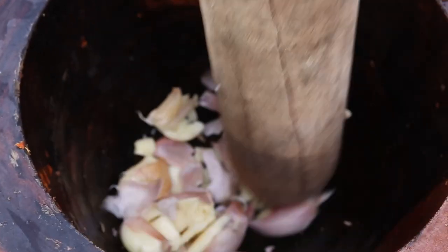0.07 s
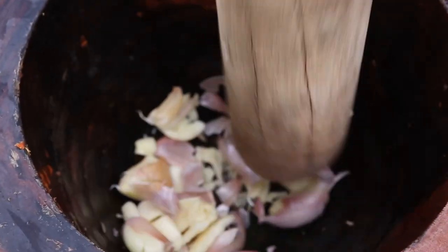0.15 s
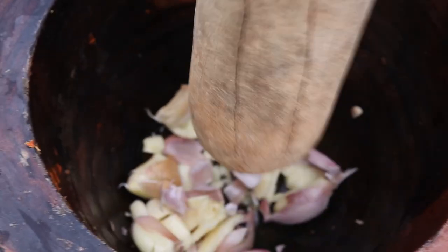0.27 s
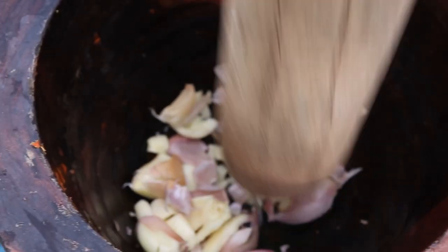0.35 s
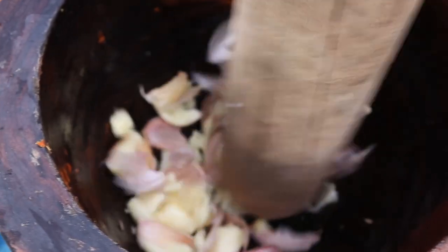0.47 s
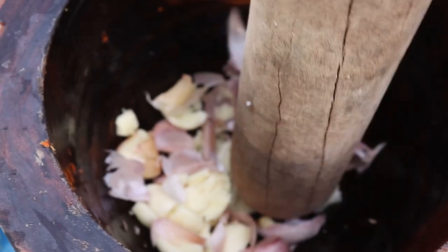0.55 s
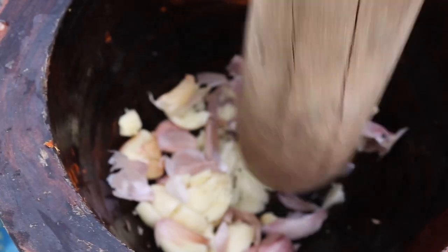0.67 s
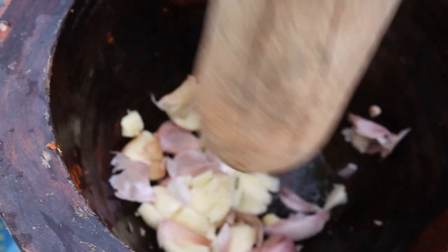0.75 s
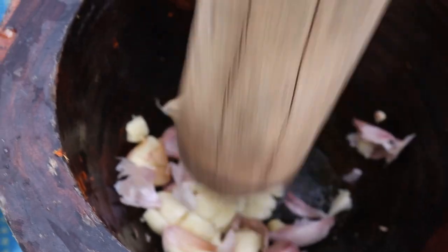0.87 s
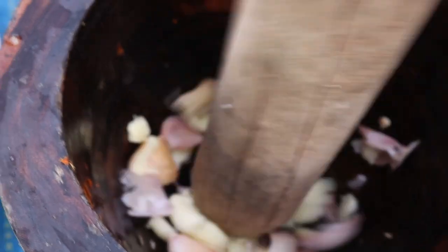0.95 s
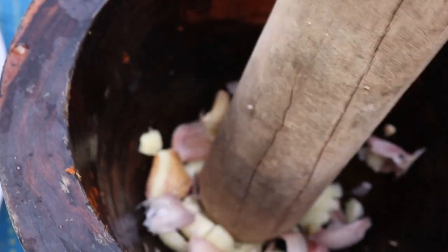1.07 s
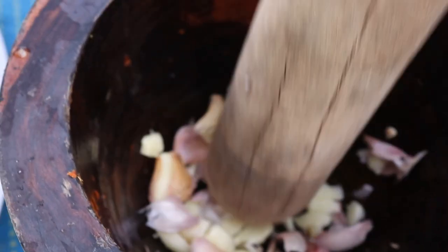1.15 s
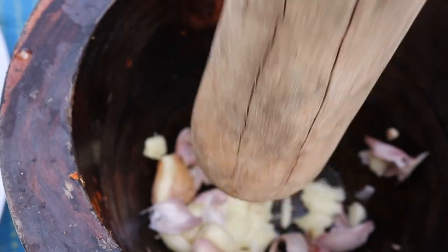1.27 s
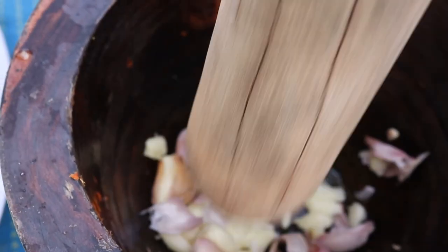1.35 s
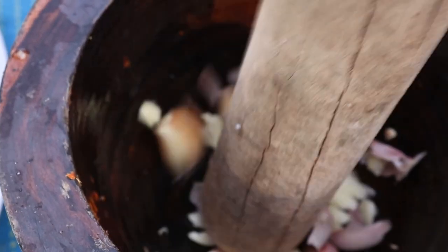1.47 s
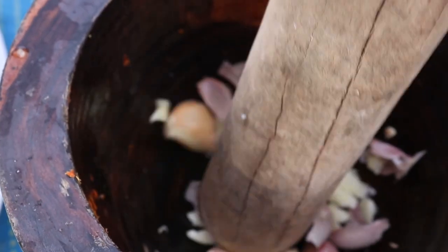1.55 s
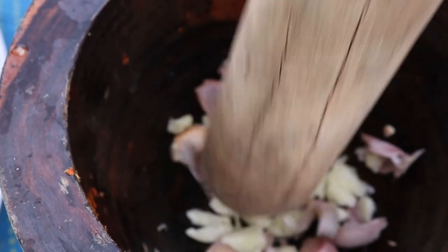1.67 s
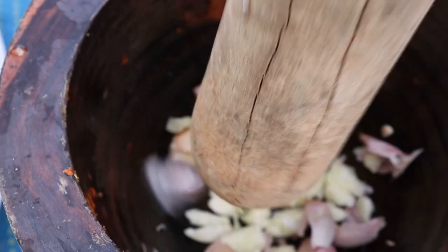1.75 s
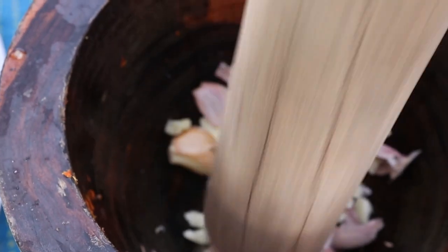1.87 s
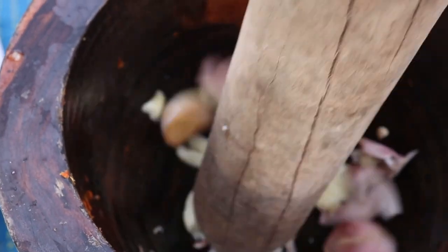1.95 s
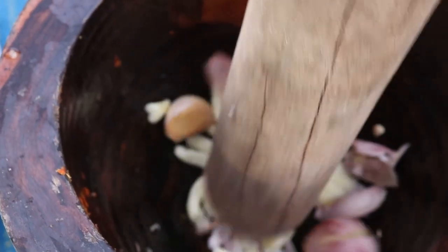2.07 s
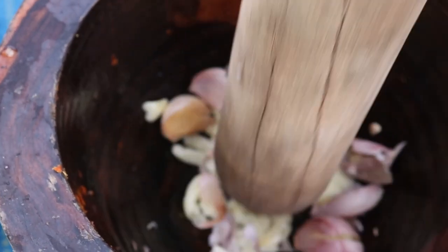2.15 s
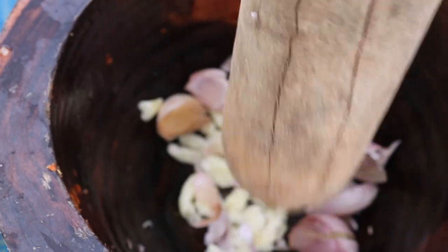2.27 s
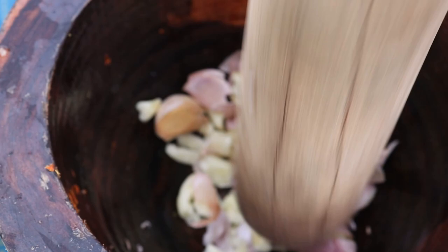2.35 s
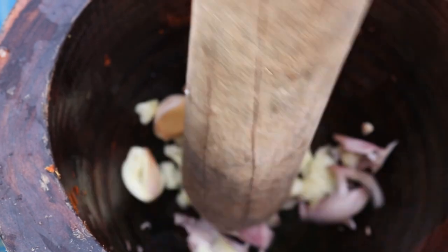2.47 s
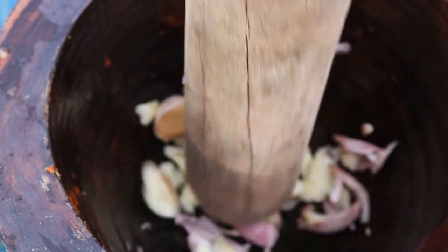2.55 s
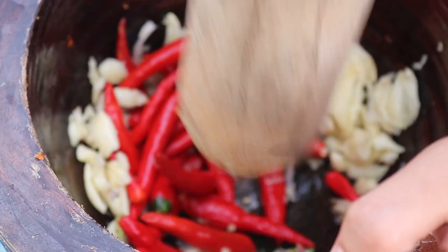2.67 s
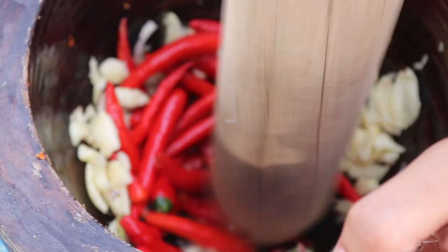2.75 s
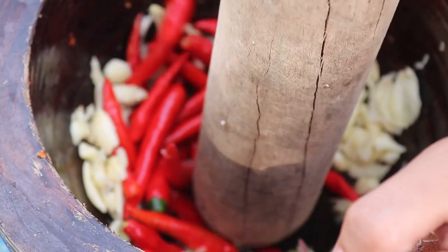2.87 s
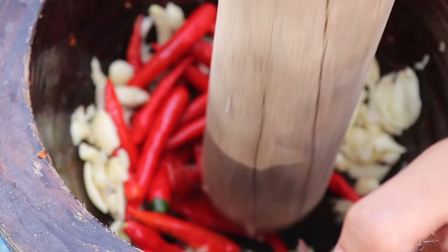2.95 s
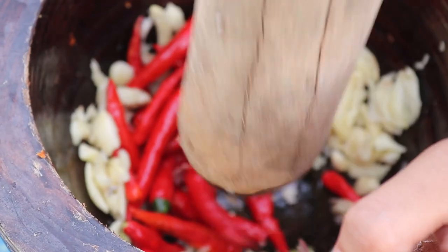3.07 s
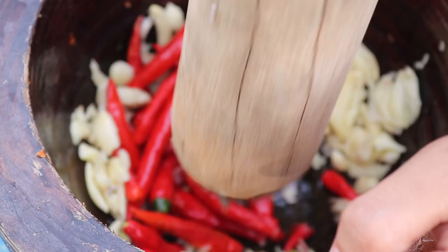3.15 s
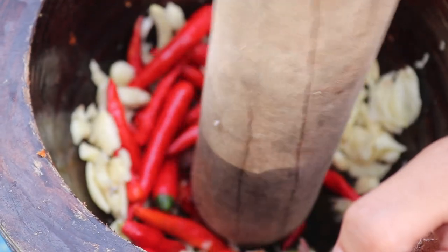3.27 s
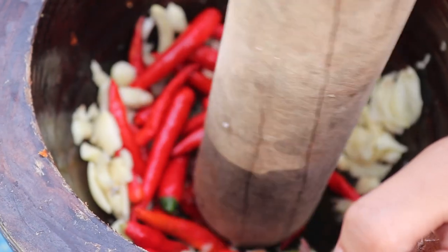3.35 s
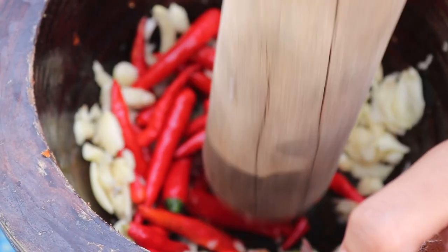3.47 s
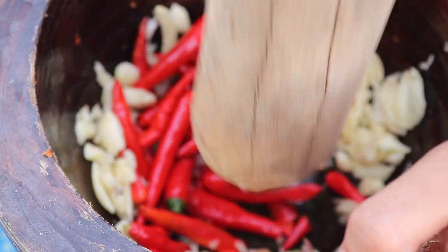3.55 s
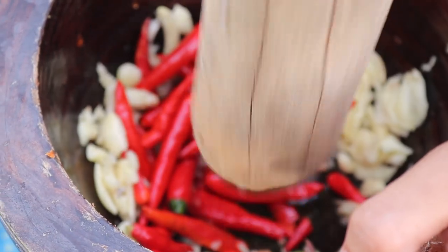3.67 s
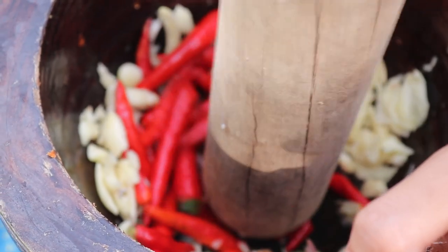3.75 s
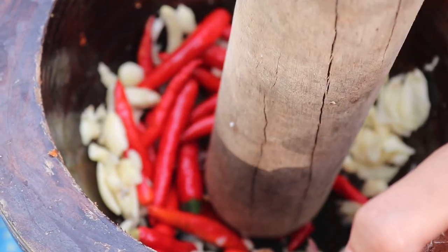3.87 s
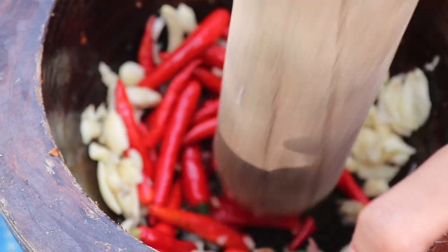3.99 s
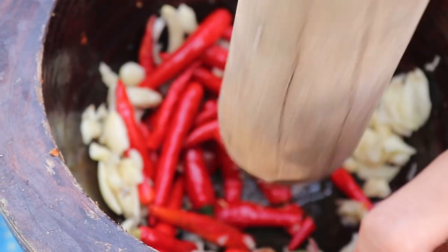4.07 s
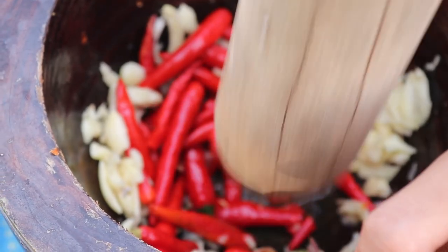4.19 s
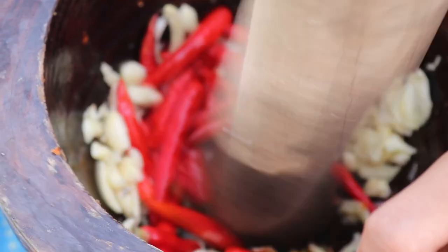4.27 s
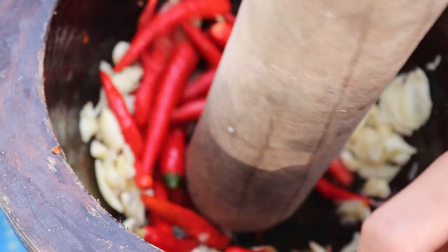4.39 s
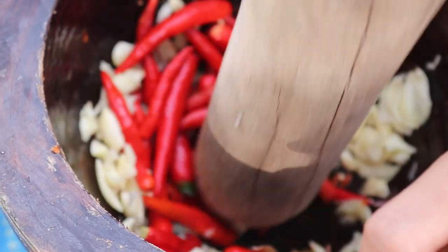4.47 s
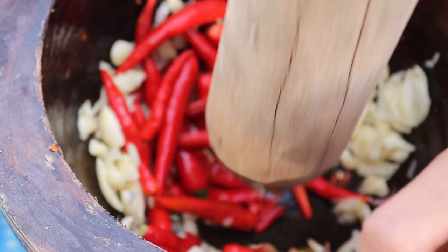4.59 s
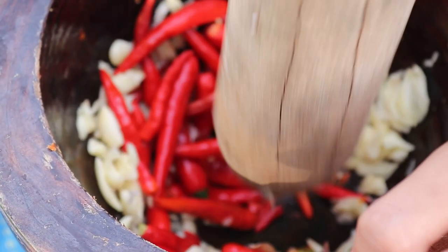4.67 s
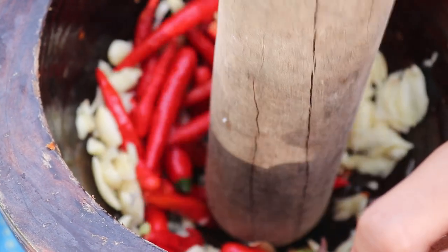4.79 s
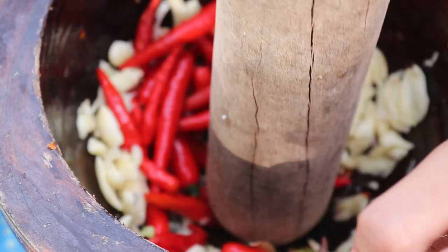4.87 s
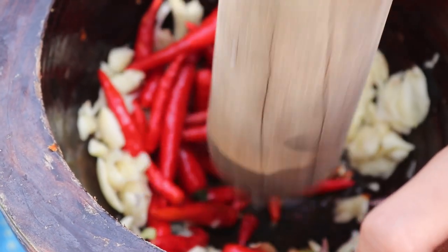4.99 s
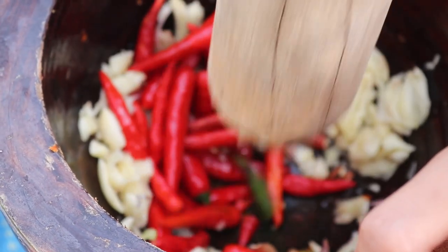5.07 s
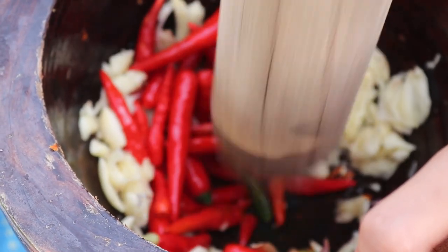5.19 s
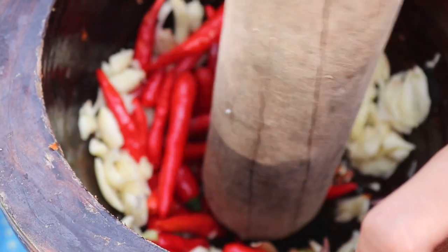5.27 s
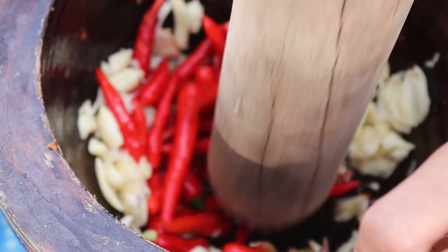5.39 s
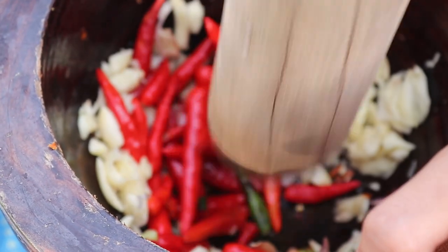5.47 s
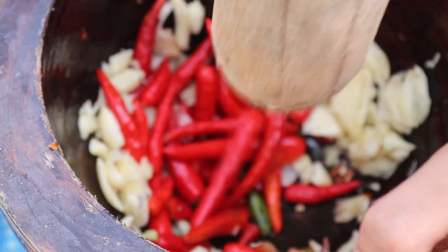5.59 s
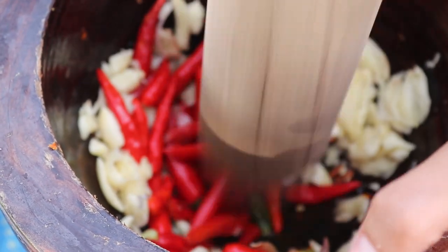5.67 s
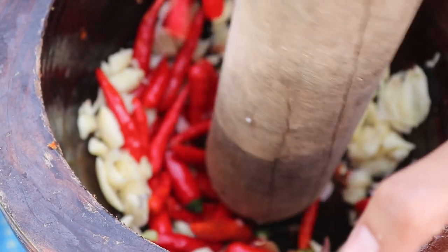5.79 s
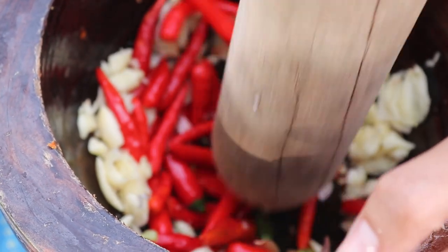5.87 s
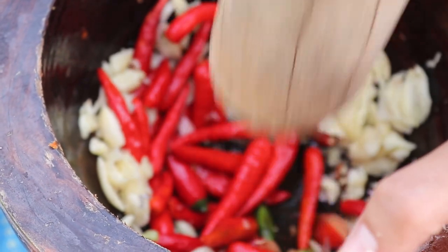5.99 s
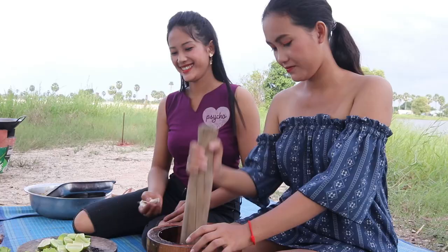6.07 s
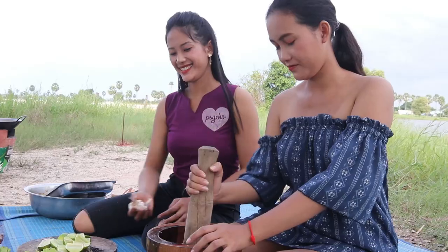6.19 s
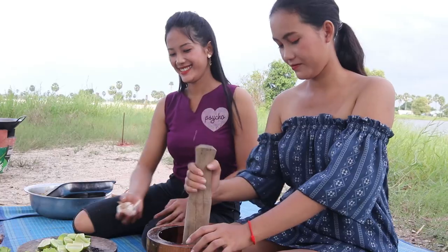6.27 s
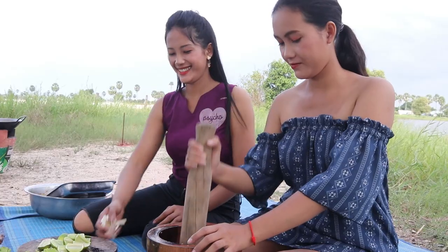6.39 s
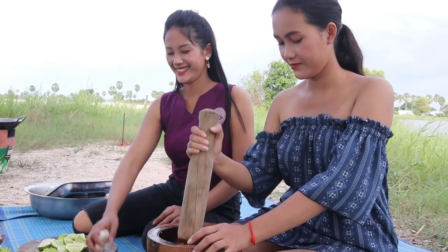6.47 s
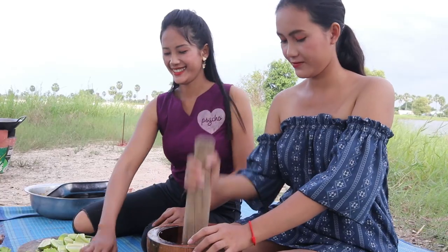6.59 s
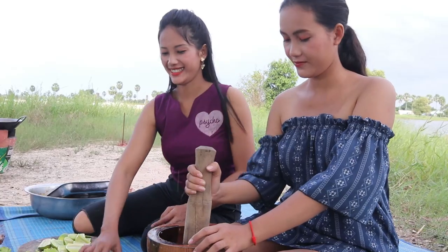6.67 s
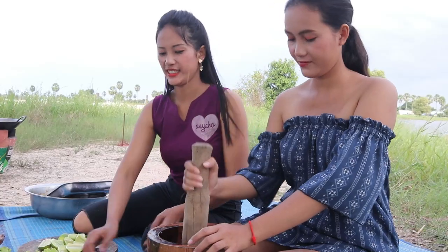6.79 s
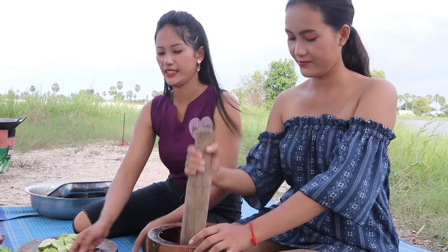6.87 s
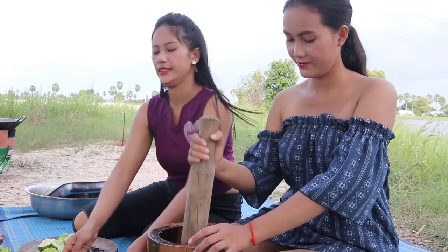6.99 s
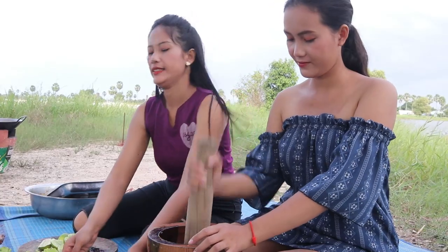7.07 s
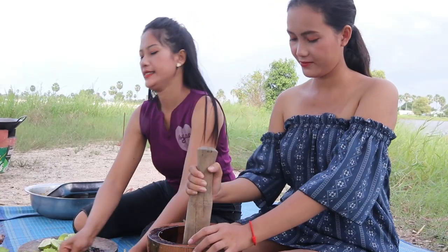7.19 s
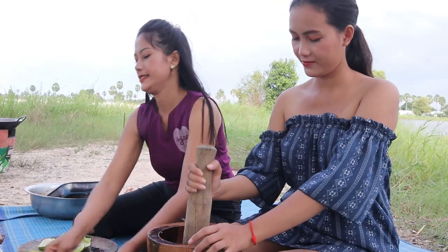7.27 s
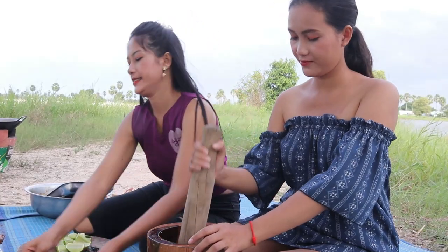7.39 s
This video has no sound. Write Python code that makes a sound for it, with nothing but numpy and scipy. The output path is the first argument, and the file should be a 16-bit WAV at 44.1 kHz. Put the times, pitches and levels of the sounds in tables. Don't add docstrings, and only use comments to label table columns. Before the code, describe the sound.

Outdoors in a breeze, a wooden pestle strikes garlic in a thick wooden mortar roughly twice a second, very close to the microphone. Cloves burst with sharp cracks and dry skins tick and rustle; a metal bowl scrapes briefly. Then chillies replace the garlic, giving moist crunches, hollow pod taps and loud woody knocks. After a tiny gap the pounding is softer, heard from the side, under stronger gusty wind.

```python
import sys
import numpy as np
from scipy import signal
from scipy.fft import rfft, irfft, next_fast_len
from scipy.io import wavfile
from scipy.ndimage import uniform_filter1d, minimum_filter1d

SR = 44100
rng = np.random.default_rng(int(sys.argv[2]) if len(sys.argv) > 2 else 0)


def invert_db(x):
    u = np.asarray(x, float) / 20
    return 10 ** u


def master(y):
    cut = np.clip(np.atleast_2d(y).T, -1, 1)
    pcm = np.round(cut * 32767)
    wavfile.write(sys.argv[1], SR, pcm.astype(np.int16))


N = 327677
CHILLI_FROM = 2.65
SILENT_FROM, SILENT_TO = 6.102, 6.113

# (frequency [Hz], density [dB per Hz])
GARLIC_SPECTRUM = [(180, -37), (300, -16), (1040, -9.5), (1610, -2), (2400, -4.5), (4150, -2.5), (5880, -4),
                   (6610, -15.5), (7540, -5), (10900, -9.5), (15900, -23)]
# (frequency [Hz], density [dB per Hz])
LEAF_SPECTRUM = [(530, -30), (900, -10), (1030, -6), (1550, -4), (2210, -3.5), (2390, -4.5), (2750, -1),
                 (3170, -4.5), (4420, -7), (5980, -11), (7390, -23), (10000, -35), (13000, -69),
                 (22000, -120)]
# (time [s], level [dB])
STIRRING = [(0, -48.5), (.23, -43), (.95, -45.5), (1.1, -42), (1.26, -46.5), (1.5, -41.5), (1.73, -41),
            (1.88, -47.5), (2.05, -39.5), (2.21, -41), (2.33, -48.5), (2.6, -47), (2.72, -35.5),
            (2.9, -37.5), (3.1, -37), (4.3, -40), (5.1, -36.5), (6.05, -38), (7.43, -39)]


def evened(x):
    return x / np.sqrt(np.mean(x ** 2) + 1e-20)


def add(mix, s, sound):
    part = mix[max(round(s * SR), 0):][:len(sound)]
    part += sound[:len(part)]


def coloured(x, points):
    hz, db = np.transpose(points)
    size = next_fast_len(len(x))
    f = np.fft.rfftfreq(size, 1 / SR)
    gain_db = np.interp(np.log(f + 1), np.log(hz + 1), db, right=-90)
    return irfft(rfft(x, size) * invert_db(gain_db), size)[:len(x)]


def resonate(x, hz, width):
    r = np.exp(-np.pi * width / SR)
    return signal.lfilter([1 - r, 0, r - 1], [1, -2 * r * np.cos(2 * np.pi * hz / SR), r * r], x)


def curve(rows, column):
    rows = np.array(rows)
    return np.interp(np.arange(N) / SR, rows[:, 0], rows[:, column])


def lumpy(size, length, depth_db):
    width = max(int(length * SR), 1)
    slow = uniform_filter1d(uniform_filter1d(rng.standard_normal(size), width), width)
    return invert_db(depth_db * evened(slow))


def mode(hz, db, t60):
    t = np.arange(SR // 8) / SR
    return invert_db(db - 60 * t / t60) * np.sin(2 * np.pi * hz * t)


def random_hits(per_s, spread_db):
    hit = rng.random(N) < per_s / SR
    strength = invert_db(spread_db * np.minimum(rng.exponential(1, N), 4))
    return hit * strength * rng.choice([-1, 1], N)


def buffeting_db():
    # (time [s], level [dB])
    breeze = [(0, -47), (.2, -38.5), (1.2, -31), (1.7, -30), (2.3, -40), (3.1, -36), (4.4, -42.5),
              (5.6, -38), (6.05, -37.5), (6.25, -26), (7.43, -27.5)]
    # (peak time [s], peak level [dB], length [s])
    gusts = [(0.182, -26.5, 0.095), (0.311, -17.5, 0.13), (0.444, -24, .2), (0.783, -25, 0.21),
             (0.984, -17.5, .09), (1.82, -25, 0.11), (2.123, -26.5, 0.19), (2.61, -26.5, 0.17),
             (2.842, -26.5, .14), (3.357, -29, .07), (3.863, -22.5, 0.05), (5.734, -28, 0.23),
             (6.291, -20.5, 0.13), (6.606, -19, 0.34), (6.97, -22.5, 0.094), (7.43, -22.5, 0.15)]
    t = np.arange(N) / SR
    pressure = invert_db(curve(breeze, 1))
    for s, db, length in gusts:
        pressure += invert_db(db) * np.exp(-8 * ((t - s) / length) ** 2)
    return 20 * np.log10(pressure)


def wind():
    # (frequency [Hz], density [dB per Hz])
    buffet_spectrum = [(5.9, -7.5), (10, 1), (28, -1), (91, -11), (113, -18.5), (188, -20.5), (250, -30.5),
                       (320, -60), (550, -120)]
    # (frequency [Hz], density [dB per Hz])
    roar_spectrum = [(47, -23), (80, -6.5), (285, -16.5), (404, -18), (480, -22), (845, -25.5),
                     (1200, -47.5), (1560, -40), (2640, -120)]
    calm_db = -34
    buffet = coloured(rng.standard_normal(N), buffet_spectrum)
    buffet /= uniform_filter1d(buffet ** 2, round(.09 * SR)) ** 0.13
    roar = evened(coloured(rng.standard_normal(N), roar_spectrum) * lumpy(N, 0.014, 1.7))
    level_db = buffeting_db()
    roar_db = -40 + 0.24 * (level_db - calm_db)
    return invert_db(level_db) * evened(buffet) + invert_db(roar_db) * roar


def rustle():
    # (frequency [Hz], length [cycles], level [dB])
    stalks = [(1480, 4.7, -4.5), (2000, 5.9, -2), (2270, 12.6, -1), (2800, 7, -2), (3480, 8.4, -4.5),
              (4500, 10, -4), (5270, 9.6, -4.5)]
    # (frequency [Hz], density [dB per Hz])
    air_spectrum = [(4500, -17.5), (5800, -9.5), (6600, -14.5), (9000, -15.5), (13500, -23.5), (15700, -26),
                    (16200, -50)]
    grains = np.zeros(N)
    for hz, cycles, db in stalks:
        t = np.arange(round(cycles * SR / hz))
        grain = np.hanning(len(t)) * np.sin(2 * np.pi * hz * t / SR)
        grains += invert_db(db) * signal.oaconvolve(random_hits(70, 3.65), grain / np.linalg.norm(grain))[:N]
    hiss = coloured(rng.standard_normal(N) * lumpy(N, 0.0019, 2.33), LEAF_SPECTRUM)
    stir_db = curve(STIRRING, 1)
    near = invert_db(stir_db) * (0.5 * evened(grains) + 0.73 * evened(hiss)) * lumpy(N, 0.012, 1.8)
    rest_db = STIRRING[0][1]
    skin_db = -10 + 1.44 * (stir_db - rest_db) + rest_db
    air_db = np.where(np.arange(N) < CHILLI_FROM * SR, skin_db, -16 + stir_db)
    air = evened(coloured(rng.standard_normal(N) * lumpy(N, .003, 2.1), air_spectrum))
    return near + invert_db(air_db) * air


def rolling_pods():
    hits = random_hits(150, 4.5)
    pod = rng.integers(-1, 3, N)
    ring = np.zeros(N)
    for k in range(-1, 3):
        hz = 2230 * (1 + .12 * k)
        ring += invert_db(-4.0 * abs(k)) * resonate(resonate(hits * (pod == k), hz, 160), hz, 900)
    t = np.arange(N) / SR
    fade_db = 3.5 * (t - CHILLI_FROM)
    present = (t > CHILLI_FROM) & (t < SILENT_FROM)
    return invert_db(curve(STIRRING, 1) - 6 - fade_db) * evened(ring) * present


def rubs():
    # (start [s], length [s], frequency [Hz], width [Hz], rms level [dB])
    short_rubs = [(0.966, 0.064, 173, 13, -16), (.45, 0.067, 181.4, 14, -29), (2.49, .05, 4200, 3500, -27),
                  (2.12, .1, 9000, 5000, -48), (1.56, .2, 9000, 5000, -51), (.15, .14, 9000, 5000, -51),
                  (0.802, 0.031, 2050, 630, -43), (1.412, .04, 590, 680, -33),
                  (1.426, 0.085, 780, 240, -39.5), (1.576, 0.18, 710, 300, -40),
                  (1.625, 0.14, 745, 22, -42), (1.6, .07, 1000, 60, -47), (1.657, 0.11, 4270, 75, -47),
                  (2.093, .12, 4230, 90, -45), (2.045, 0.13, 2900, 60, -45), (2.1, .09, 2400, 70, -45),
                  (2.535, .03, 3500, 4000, -40), (3.856, 0.005, 2710, 460, -6),
                  (4.371, .011, 1650, 120, -3), (7.33, .12, 9000, 5000, -47),
                  (2.657, 0.076, 2000, 2450, -32), (6.786, 0.043, 1125, 81, -35),
                  (6.825, .012, 1460, 200, -36)]
    out = np.zeros(N)
    for s, length, hz, width, db in short_rubs:
        noise = rng.standard_normal(SR // 2) * lumpy(SR // 2, .002, 3.0)
        tone = resonate(resonate(noise, hz, width), hz, width)[-round(length * SR):]
        add(out, s, invert_db(db) * evened(tone) * signal.windows.tukey(len(tone), .7))
    return out


def metal_scrape():
    # (start [s], length [s], rms level [dB])
    drags = [
        (1.825, 0.099, -28.5),
        (1.91, .075, -40),
    ]
    # (frequency [Hz], width [Hz], level [dB])
    metal_modes = [(651, 44, -9), (1440, 31, -6), (2450, 36, -7), (2790, 24, 0), (3160, 56, -12),
                   (4020, 40, -1), (4250, 31, -7), (5880, 36, -1), (7430, 33, -15), (9240, 36, -19),
                   (11100, 33, -26), (13200, 43, -29)]
    out = np.zeros(N)
    for s, length, db in drags:
        slips = rng.standard_normal(SR // 2) * lumpy(SR // 2, 0.005, 2.2)
        lines = np.zeros(SR // 2)
        for hz, width, line_db in metal_modes:
            line = resonate(resonate(slips, hz, .9 * width), hz, 22 * width)
            lines += invert_db(line_db) * np.sqrt(width) * evened(line)
        lines = evened(lines) + 0.3 * evened(coloured(slips, GARLIC_SPECTRUM))
        lines = lines[-round(length * SR):]
        add(out, s, invert_db(db) * evened(lines) * signal.windows.tukey(len(lines), .85))
    return out


def settling_bits():
    # (start [s], length [s], least peak level [dB], frequency [Hz], papery top [dB below the peak])
    flurries = [
        (.07, .23, -33, 3300, -11),
        (.4, .08, -30, 3000, -25),
        (1.08, .3, -37, 2900, -19),
        (1.56, .26, -35, 2900, -12),
        (2.04, .32, -34, 3100, -9),
        (2.64, .14, -33, 2400, -19),
        (3.38, .25, -31, 2300, -31),
        (6.75, .06, -33, 2400, -19),
    ]
    slot, chance, detune = 1000, .095, .3
    rows = []
    for start, length, db, hz, top_db in flurries:
        when, size, tune = rng.random((round(length * SR / slot), 3)).T
        for k in np.flatnonzero(when < chance):
            peak_db = db - 3.2 * np.log(size[k] + .02)
            rows.append((start + k * slot / SR, peak_db, hz * (1 + detune * (2 * tune[k] - 1)), top_db))
    return rows


def snaps():
    # (time [s], peak level [dB], frequency [Hz], papery top [dB below the peak])
    clear_snaps = [(.176, -27, 4830, -9), (.1972, -22, 4370, 0.5), (.2073, -15.5, 3700, -5),
                   (.2115, -16, 4750, -26), (.25, -26, 6000, -5), (.2772, -25.5, 3150, -2),
                   (.409, -22, 2770, -31), (.851, -26.5, 4260, -31), (1.1865, -27, 2540, -22),
                   (1.0537, -27, 2100, -15), (1.1094, -24.5, 2730, -22), (1.145, -28, 2830, -30),
                   (1.2087, -23.5, 3670, -7), (1.2275, -26, 3080, -12), (1.2516, -28, 2800, -1),
                   (1.273, -27, 5180, -6), (1.629, -23, 2450, -24), (1.711, -20, 4970, -26),
                   (2.1985, -24, 2870, -17), (2.444, -29, 1500, -25), (2.6318, -29, 2920, -5),
                   (2.6444, -29, 3490, -1), (2.079, -32, 2780, -3), (3.1154, -22, 2220, -33),
                   (3.243, -19.5, 2190, -35), (3.444, -22, 2200, -32), (3.5515, -19, 2170, -33),
                   (4.5842, -21.5, 1920, -31), (5.7397, -22, 2280, -30), (6.786, -26, 2370, -21)]
    out, t = np.zeros(N), np.arange(400) / SR
    for s, db, hz, top_db in list(clear_snaps) + settling_bits():
        puff = rng.standard_normal(len(t)) * np.exp(-t / 0.0011) * (1 - np.exp(-t / 0.00012))
        pitch = evened(resonate(resonate(puff, hz, 0.4 * hz), hz, 0.4 * hz))
        snap = pitch + 0.42 * evened(coloured(puff, LEAF_SPECTRUM))
        top = resonate(resonate(puff, 9200, 4500), 9200, 4500)
        add(out, s, invert_db(db + 0.5) * (snap / abs(snap).max() + invert_db(top_db) * top / abs(top).max()))
    return out


def taps():
    # (time [s], peak level [dB], frequency [Hz])
    garlic_bits = [(0.7736, -32, 2900), (0.8644, -35, 2940), (0.8974, -29, 2270), (1.2952, -27, 2490),
                   (1.3486, -31, 2250), (1.365, -26, 2930), (1.4129, -26, 2240), (1.4279, -26, 2470),
                   (1.4644, -32, 2630), (1.5832, -24, 4720), (1.657, -26, 2350), (1.7423, -30, 2710),
                   (1.7712, -27, 2470), (1.7932, -34, 2220), (1.8087, -29, 2590), (1.8824, -20, 2800),
                   (1.9583, -25, 3980), (2.1259, -27, 4220), (2.1694, -24, 3330), (2.2217, -26, 2800),
                   (2.2681, -30, 4440), (2.3055, -33, 3220), (2.3509, -33, 2250)]
    # (time [s], peak level [dB], frequency [Hz])
    pod_taps = [(2.6631, -24, 1800), (2.6856, -20, 1770), (2.7025, -20, 2660), (2.7174, -19, 2220),
                (2.7501, -19, 2160), (2.7756, -22, 2900), (2.8058, -24, 2940), (2.9989, -24, 1920),
                (3.0228, -27, 2800), (3.0634, -23, 1880), (3.4015, -21, 3210), (3.4206, -21, 2250),
                (3.4932, -24, 2220), (3.6015, -20, 2400), (3.7626, -24, 2210), (3.8015, -23, 1910),
                (3.9737, -25, 2230), (4.0859, -25, 2290), (4.6865, -26, 1980), (5.0168, -23, 2200),
                (5.0427, -25, 1780), (5.0602, -22, 4700), (5.1919, -25, 2210), (5.2338, -24, 2920),
                (5.3849, -26, 2200), (5.4206, -24, 2690), (5.4663, -24, 3040), (5.4872, -23, 2290),
                (5.5142, -24, 1750), (5.5605, -28, 2180), (5.6106, -24, 2660), (5.6698, -23, 2150),
                (5.7187, -21, 2310), (5.9522, -25, 4790), (6.336, -26, 2530), (6.6199, -25, 2800),
                (6.765, -22, 1320), (6.7934, -23, 1480), (7.0319, -25, 1290), (7.0618, -24, 2760),
                (7.1117, -26, 3310), (7.1302, -25, 2020), (7.1671, -26, 2420), (7.2649, -24, 3010),
                (7.2953, -25, 3010), (7.3716, -21, 1460)]
    out, t = np.zeros(N), np.arange(600) / SR
    for s, db, hz in garlic_bits + pod_taps:
        contact = rng.standard_normal(len(t)) * np.exp(-t / .0013)
        tap = resonate(resonate(contact, hz, .3 * hz), hz, .6 * hz)
        add(out, s, invert_db(db - 2.5) * tap / abs(tap).max())
    return out


def pops():
    # (time [s], peak level [dB], frequency [Hz], t60 [s])
    woody_pops = [(3.8505, -20, 2000, .03), (3.852, -18, 720, .03), (3.8572, -3, 2700, .02),
                  (3.859, -11, 1750, .02), (5.3175, -11, 1240, .02), (5.3225, -16, 4500, .02),
                  (5.330, -5, 2750, .025), (5.332, -12, 1900, .02), (5.331, -15, 680, .03),
                  (2.505, -29, 1600, .04), (2.522, -29, 1680, .04), (2.4825, -14, 1450, .02),
                  (1.034, -16, 2900, .03), (6.2325, -22, 1350, .03), (6.236, -20, 270, .03),
                  (6.2405, -19, 520, .035), (6.25, -22, 170, .07), (6.727, -15, 560, .04),
                  (6.736, -24, 1800, .03), (6.738, -20, 200, .06), (6.741, -28, 600, .03),
                  (7.2065, -11, 800, .025), (7.222, -27, 620, .06), (5.7925, -17, 1950, .03),
                  (3.861, -20, 1600, .05), (7.009, -25, 1810, .03)]
    out = np.zeros(N)
    swell = 1 - np.exp(-np.arange(SR // 8) / SR / .0012)
    for s, db, hz, t60 in woody_pops:
        add(out, s, swell * mode(hz, db + 4.0, t60))
    return out


def cracks():
    # (time [s], peak level [dB], frequency [Hz])
    skin_cracks = [(1.0152, -17, 3500), (1.0213, -18, 4300), (1.026, -15, 5000), (1.055, -27, 5000),
                   (1.508, -27, 2900), (1.5218, -14, 2100), (1.528, -11, 8500), (1.5313, -6, 3300),
                   (2.4888, -5, 4300), (2.508, -17, 4800), (2.547, -27, 3500), (2.5605, -8, 3600),
                   (2.564, -24, 3500), (.5065, -7, 4500), (4.3705, -4, 3300), (4.372, 0, 3400),
                   (1.5335, -9, 10500), (1.5352, -7, 9500), (1.5425, -18, 9000), (5.7975, -8, 4800),
                   (5.7995, -7, 4200), (5.773, -26, 3200), (5.832, -27, 2500), (.532, -27, 3000),
                   (.611, -33, 2200)]
    out, t = np.zeros(N), np.arange(-100, 100) / SR
    for s, db, hz in skin_cracks:
        bell = np.exp(-(t * hz / .9) ** 2 * (1 + 3.0 * (t < 0)))
        add(out, s + t[0], invert_db(db) * bell * np.sin(2 * np.pi * hz * t))
    return out


def bowl(ring, upper_db):
    # (frequency [Hz], level [dB], t60 [s])
    bowl_modes = [(626.4, 6, 0.028), (616, -31.5, 0.16), (1316, -5, 0.027), (1570, -6.5, 0.023),
                  (1872, -7.5, 0.031), (3000, -43, .03), (517, -16, 0.052), (753, -2, 0.015)]
    return sum(mode(hz, db + upper_db * (hz > 700), t60 * ring) for hz, db, t60 in bowl_modes)


def crunches():
    # (peak time [s], rms level [dB], rise [ms], fall [ms])
    garlic_bursts = [(.002, -31.5, 3.3, 11), (.050, -37, 3.7, 31), (.500, -16, 1.5, 2.5),
                     (.509, -4, 4.2, 2.7), (.514, -14.5, 1.7, 9.2), (0.696, -37, 15, 35),
                     (.962, -34.5, 14, 22), (1.027, -21, 6.2, 2.3), (1.0319, -5, .22, 1.3),
                     (1.0385, -13, 5, 4.6), (1.524, -20, 5.4, 5), (1.5345, -7.5, 2.5, 2.2),
                     (1.543, -20, 3, 19), (1.993, -23, .83, 3.9), (2.005, -9.5, 5.7, 1.1),
                     (2.009, -10, 2.9, 4.5), (2.484, -14, 0.51, 1.9), (2.489, -9, 1.4, 1.6),
                     (2.561, -24, 0.35, 2.5)]
    # (peak time [s], rms level [dB], rise [ms], fall [ms])
    chilli_bursts = [(2.862, -16, 1.1, 1.5), (2.865, -5.5, 2.9, 3.7), (3.343, -24, 2.3, 1.8),
                     (3.351, -9.5, 1.6, 2.2), (3.355, -12, 2.6, 4.3), (3.856, -10, 3.7, 3.7),
                     (3.8585, -3, 0.64, 1.95), (4.372, -3, 2.4, 3.6), (4.856, -6.5, 3.5, 4.5),
                     (5.319, -16, .6, 3.1), (5.333, -8, 3.8, 3.9), (5.785, -16, .5, 7), (5.798, -11, 9, 5),
                     (5.814, -17, .8, 14), (6.235, -14, .4, 1.6), (6.724, -16, 1.3, 3.9),
                     (6.740, -31, 4.6, 19), (7.009, -23, 0.25, 2.9), (7.206, -18, 0.69, 3.9),
                     (7.381, -33.5, 50, 50)]
    # (frequency [Hz], density [dB per Hz])
    chilli_spectrum = [(180, -31.5), (300, -21), (655, -11), (1130, -5), (2240, -6.5), (2650, -6),
                       (3750, -4.5), (4980, -4), (6280, -14), (7800, -8.5), (15900, -28.5)]
    out, size = np.zeros(N + SR), round(.3 * SR)
    t = (np.arange(size) / SR - .1) * 1000
    ring = bowl(0.68, -12.0)
    dull_filter = signal.butter(2, 3200, fs=SR)
    # its bursts, spectrum, colour in Hz, and dB of it that reaches the bowl
    foods = [(garlic_bursts, GARLIC_SPECTRUM, 3300, -26), (chilli_bursts, chilli_spectrum, 2450, -16)]
    for rows, spectrum, hz, bowl_db in foods:
        for s, db, rise, fall in rows:
            bursts = rng.standard_normal(size) * lumpy(size, 0.00031, 3.46)
            shape = np.exp(np.where(t < 0, t / rise, -t / fall))
            shape += invert_db(-24) * (t < 0) * np.exp(-abs(t) / 7)
            wide = evened(coloured(bursts, spectrum))
            body = wide + 0.51 * evened(resonate(wide, hz, .5 * hz))
            dull = signal.lfilter(*dull_filter, body)
            crush = dull * shape + (body - dull) * shape ** 1.3
            push = bursts / np.std(bursts) * shape
            shaken = signal.fftconvolve(push, ring / np.linalg.norm(ring))[:size]
            both = crush / np.linalg.norm(crush) + invert_db(bowl_db) * shaken / np.linalg.norm(shaken)
            add(out, s + .4, invert_db(db) * np.linalg.norm(shape) * both)
    return out[SR // 2:][:N]


def soft_start():
    return 1 - np.exp(-np.arange(SR // 8) / SR / 0.0015)


def knocks():
    # (time [s], peak level [dB], ring length [factor], upper modes [dB], pestle ring [dB])
    bowl_hits = [(.001, -26, 2.3, -25, -10), (.057, -14.5, 0.77, -25, -30), (.5156, 10.1, 0.5, -9.5, -38),
                 (.584, 7.5, .36, -6.5, -30), (.591, -8.5, .64, -25, -22), (1.532, -36, .5, -3, 16),
                 (2.482, -29, .7, 2, 15), (2.560, -41, .5, -3, 10), (2.866, 12, 0.89, -2, -28),
                 (3.353, -12, 0.68, 3, -11), (4.3724, 10, 0.8, -8.5, -24), (4.857, 12, 1.03, -3.5, -42),
                 (5.331, -12, 0.68, -4, -14), (5.787, -22, .7, 3, -7), (2.004, -26, .7, -6, 3),
                 (3.853, -13, .45, 6, -6)]
    out = np.zeros(N)
    thud = mode(214, -29, 0.023)
    for s, db, ring, upper_db, pestle_db in bowl_hits:
        pestle = mode(1647, pestle_db, 0.075) + invert_db(pestle_db) * mode(2595, -11, .06)
        add(out, s, invert_db(db) * soft_start() * (bowl(ring, upper_db) + pestle + thud))
    return out


def knocks_beside():
    # (time [s], peak level [dB], ring length [factor], upper modes [dB], ground [dB])
    side_hits = [
        (6.234, -20, .7, 12, 11),
        (6.240, -18, .7, -15, 7),
        (6.7235, -19, .9, 9, 7),
        (6.727, -9, .75, -15, -5),
        (7.2055, -6, 1.05, 3, -4),
    ]
    # (frequency [Hz], level [dB], t60 [s])
    side_modes = [(622, -17, .09), (640, -2.5, .028), (850, -3, .016), (1225, -1.5, .028), (1640, -15, .07),
                  (1790, -.5, .022), (440, -5, .022), (290, -2.5, .035), (156, -8, .11)]
    out = np.zeros(N)
    for s, db, ring, upper_db, ground_db in side_hits:
        modes = np.zeros(SR // 8)
        for hz, mode_db, t60 in side_modes:
            modes += mode(hz, mode_db + upper_db * (hz > 900) + ground_db * (hz < 450), t60 * ring)
        add(out, s, invert_db(db) * np.sqrt(soft_start()) * modes)
    return out


def scene():
    background = wind() + rustle() + rolling_pods() + rubs() + metal_scrape()
    bits = snaps() + taps() + pops() + cracks()
    blows = crunches() + knocks() + knocks_beside()
    return (background + bits + blows)[None]


def top_cut(x):
    return signal.sosfilt(signal.butter(12, 16090, fs=SR, output="sos"), x)


def record(dry):
    power_db = 10 * np.log10(signal.lfilter([.006], [1, -.994], dry[0] ** 2) + 1e-12)
    hold = round(.06 * SR)
    padded_db = np.r_[np.full(hold, -99.), power_db]
    held_db = -minimum_filter1d(-padded_db, hold, origin=(hold - 1) // 2)[hold:]
    t = np.arange(N) / SR
    fall = t * 160.0
    over_db = np.maximum(np.maximum.accumulate(held_db + fall) - fall + 12.0, 0)
    ducked = dry / invert_db(0.56 * signal.lfilter([.005], [1, -.995], over_db))
    gate = np.clip(np.maximum(SILENT_FROM - t, t - SILENT_TO) / 0.00073, .002, 1)
    return top_cut(np.clip(ducked, -1, 1) * gate)


dry = scene()
out = record(dry)
master(out)
```